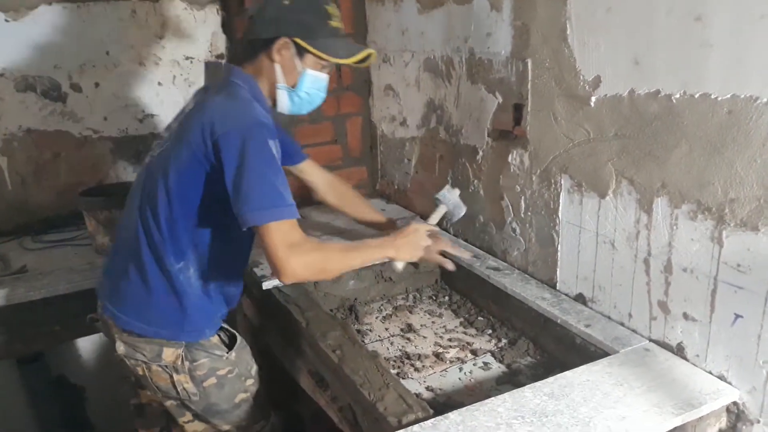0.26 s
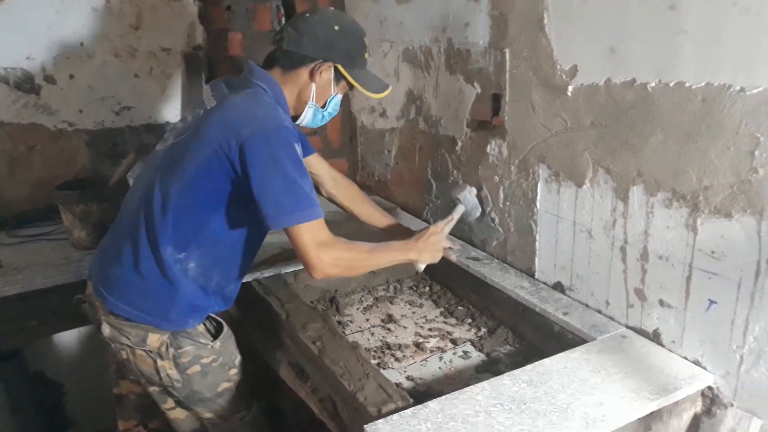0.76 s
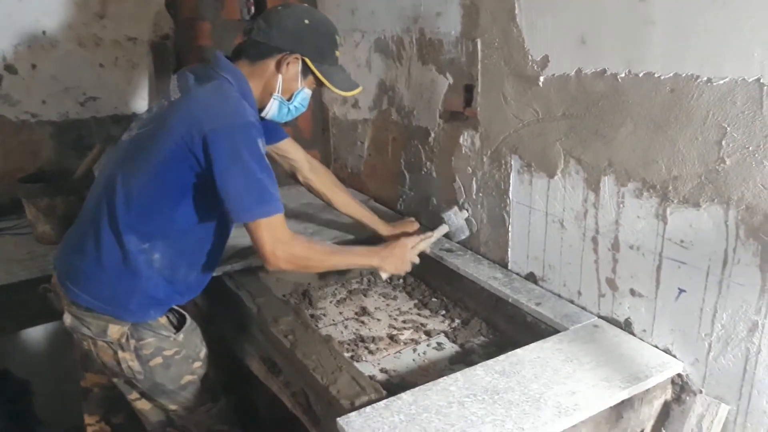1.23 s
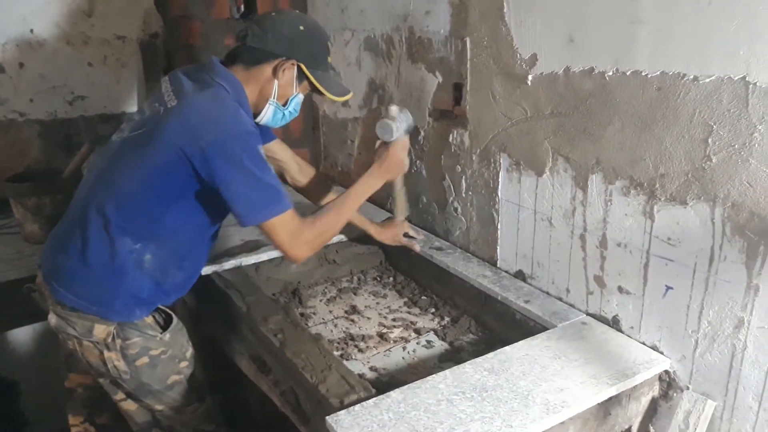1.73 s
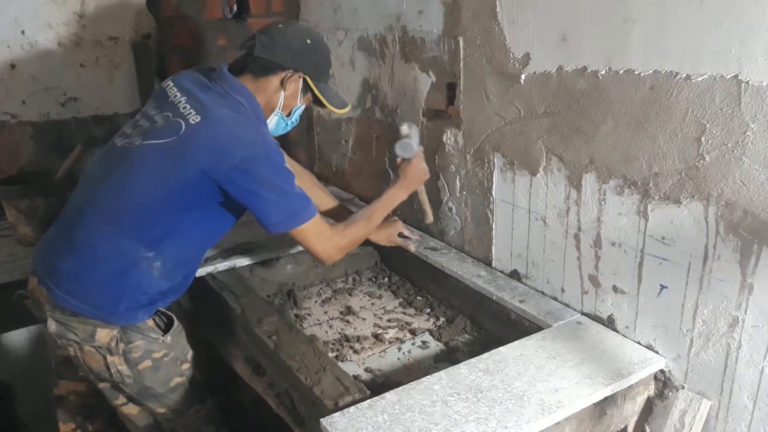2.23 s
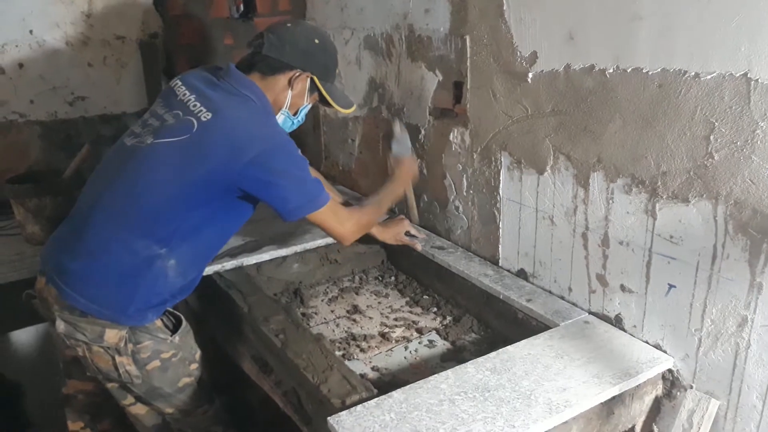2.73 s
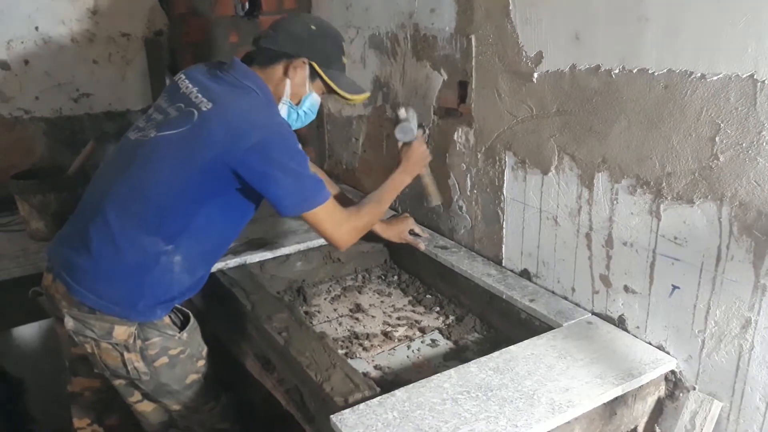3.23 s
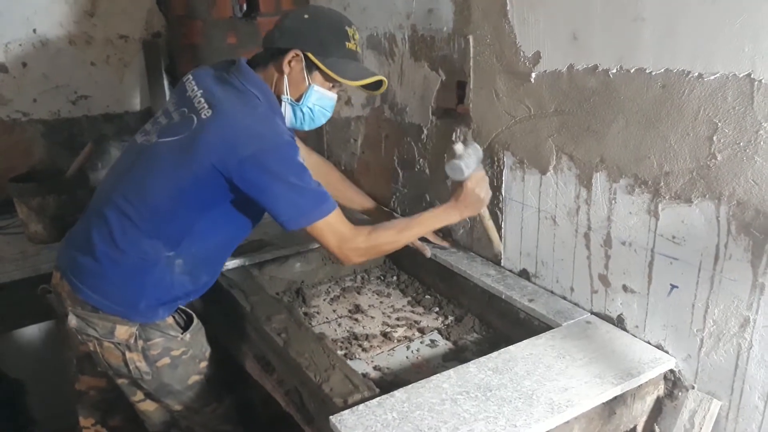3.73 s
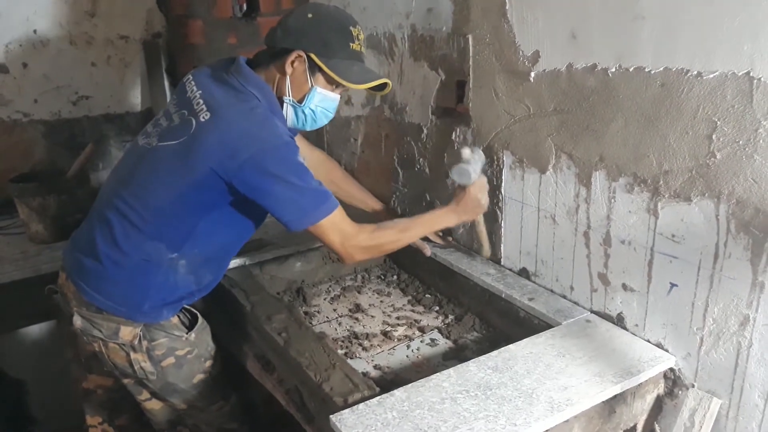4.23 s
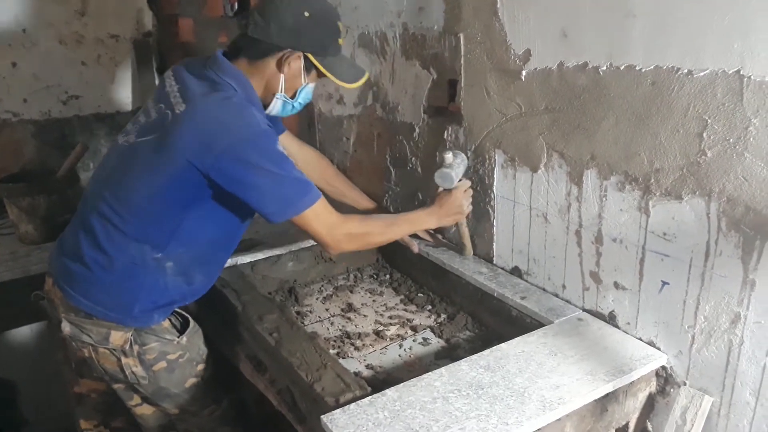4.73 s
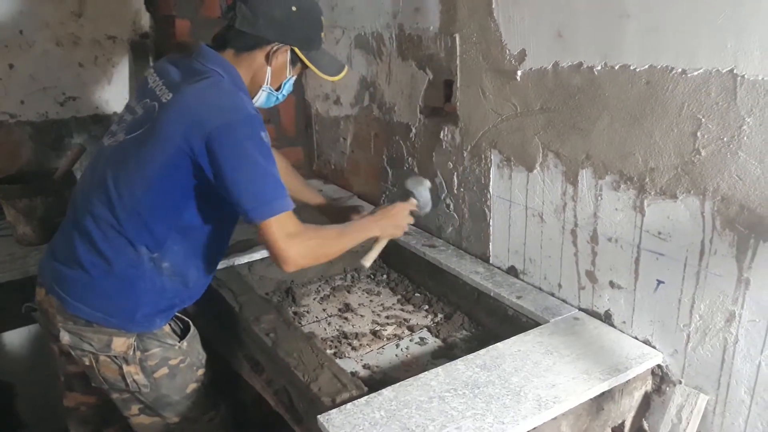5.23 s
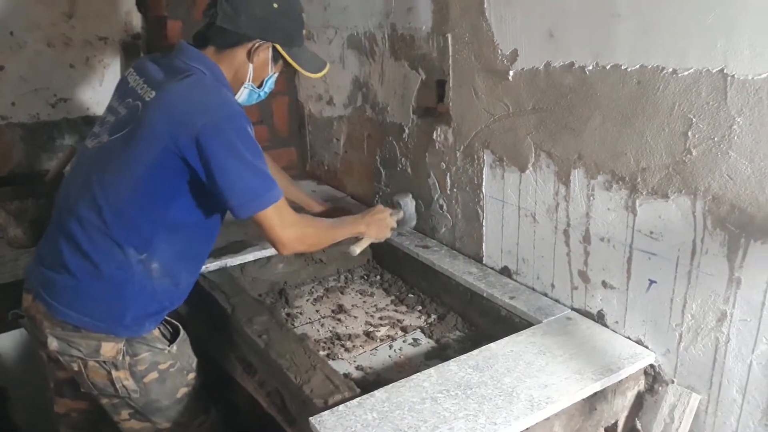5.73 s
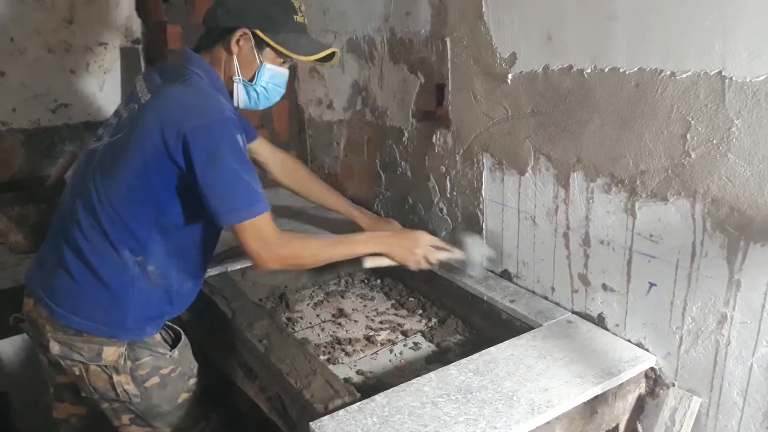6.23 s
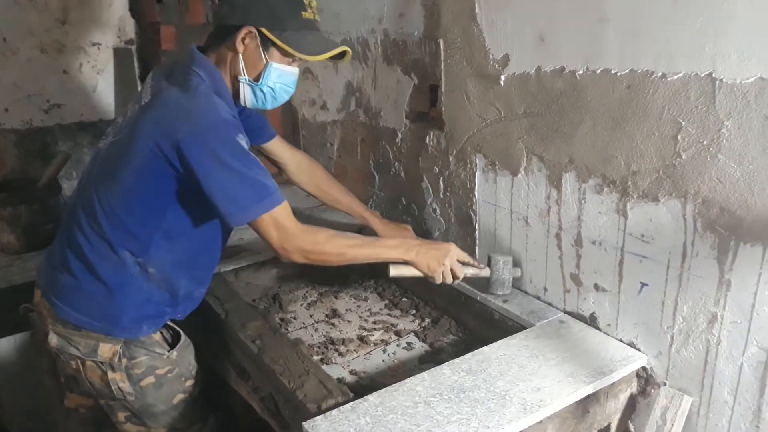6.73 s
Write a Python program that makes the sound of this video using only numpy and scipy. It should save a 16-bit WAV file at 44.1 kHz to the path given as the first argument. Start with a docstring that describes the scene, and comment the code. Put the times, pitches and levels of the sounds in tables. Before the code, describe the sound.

In a small, bare, echoing room, a stone slab is knocked into mortar with a rubber mallet close to the microphone. One bright clack comes first, then a run of nine sharp blows that quickens near its end, and finally five softer thudding taps in two groups. A faint hiss of distant building work continues underneath, dipping after the loud hits, with slight grit ticks and low rumbles.

```python
"""Bedding a stone countertop

A rubber mallet beds a stone slab in mortar in a small bare room: one hard double clack, nine sharp
blows at a few spots along the edge, then five light taps. The mortar damps the stone, so most of the
ring is the room's. Grit and the handle tick faintly, with a few deep rumbles and far squeaks behind.
A distant hiss of site work ducks under the gain control after loud blows."""
import sys
import numpy as np
from scipy import signal
from scipy.fft import rfft, irfft, next_fast_len
from scipy.io import wavfile
from scipy.ndimage import uniform_filter1d, minimum_filter1d

SR = 44100
rng = np.random.default_rng(int(sys.argv[2]) if len(sys.argv) > 2 else 0)


def master_out(mix):
    """Clip the mix to full scale and print it as 16-bit PCM to the path in sys.argv[1]."""
    frames = np.transpose(np.atleast_2d(mix))
    ceiling = np.clip(frames, -1, 1)
    pcm = np.round(ceiling * 32767).astype(np.int16)
    wavfile.write(sys.argv[1], SR, pcm)


N = 308259
SIZE = 65536  # samples in one impulse response
HZ = np.fft.rfftfreq(SIZE, 1 / SR)
T = np.arange(SIZE) / SR

# a graze, then the nine full blows: t/s, strength/dB, clink/dB
BLOWS = [(2.012, -19, -6), (2.0321, 3.5, 19.5), (2.3343, 2, 21.5), (2.774, -0.43, 23.5), (3.04, -2, 19),
         (3.583, 2.5, 29), (3.8914, 0, 29), (4.1595, -0.2, 26), (4.402, 0, 28.5), (4.5638, -2.5, 21.5)]
# spots worked in turn, each coloured by the bedding under it:
# from t/s, clack/dB, crack/dB, clink f/Hz, favoured ring f/Hz
SPOTS = [(0, 6.2, 2.2, 4950, 290), (1.8, -4.5, -6, 4000, 924), (2.55, -3, -3, 3990, 403),
         (3.3, -5.5, -4, 4155, 3000), (5, -1.2, 3.5, 5150, 300), (6.1, -10.5, -13, 4230, 286)]


def amp(db):
    """Decibels to gain."""
    return 10 ** (np.asarray(db) / 20)


def along(points, hz):
    """Read a curve of (f/Hz, value) points on a log frequency axis."""
    f, v = np.transpose(points)
    return np.interp(np.log(hz + 1), np.log(f + 1), v)


def filtered(x, response):
    """Shape x with a frequency response."""
    size = next_fast_len(N + SR)
    return irfft(rfft(x, size) * response(np.fft.rfftfreq(size, 1 / SR)), size)[:N]


def noise(response):
    """Coloured noise of rms 1."""
    x = filtered(rng.standard_normal(N), response)
    return x / np.sqrt(np.mean(x ** 2) + 1e-20)


def causal(db):
    """Minimum-phase response with these gains: it starts at once and rings afterwards."""
    cepstrum = irfft(db * np.log(10) / 20)
    cepstrum[1:SIZE // 2] *= 2
    cepstrum[SIZE // 2 + 1:] = 0
    return np.exp(rfft(cepstrum))


def resonances(modes, f):
    """Band-pass modes (f/Hz, width/Hz, level/dB), summed with alternating polarity."""
    return sum((-1) ** k * amp(db) * 1j * f * width / (hz * hz - f * f + 1j * f * width)
               for k, (hz, width, db) in enumerate(modes))


def add(track, s, response):
    """Sound the first second of a response at time s."""
    part = track[round(s * SR):][:SR]
    part += irfft(response)[:len(part)]


def site_work(hiss_db=-44, floor_db=-53, hum_db=-59):
    """Distant work: a nearly steady hiss over a steady noise floor and a faint hum."""
    # slow drift of the hiss: t/s, level/dB
    drift = [(.3, 1.3), (1.3, 0.8), (6.9, 2.24)]
    # colour of the hiss: f/Hz, level/dB
    hiss_tone = [(25, -55.5), (100, -7.5), (300, -5.5), (600, -8.5), (1100, -3.5), (1900, 2.5),
                 (2700, -2.5), (4000, -15), (7000, -19.5), (15000, -24.5)]
    # colour of the noise floor: f/Hz, level/dB
    floor_tone = [(20, -32), (32, -23), (50, -1), (110, 2), (230, -9), (400, -7.5), (1000, 2.5), (4000, -8),
                  (7000, -19), (15000, -15.5)]
    # bands of the hum: f/Hz, width/Hz, level/dB
    hum_bands = [(108, 9.8, -11.5), (222.7, 4.3, 1.5), (313.4, 7.8, -14.5)]
    drift_db = np.interp(np.arange(N) / SR, *np.transpose(drift))
    hiss = amp(hiss_db + drift_db) * noise(lambda f: amp(along(hiss_tone, f)))
    floor = amp(floor_db) * noise(lambda f: amp(along(floor_tone, f)))
    hum = amp(hum_db) * noise(lambda f: resonances(hum_bands, f) * f / (f + 100))
    return hiss + floor + hum


def reverberation(build_s=0.00083, corner_db=-3, corner_s=0.06):
    """One path through the room: a diffuse tail of equal energy per Hz, dying faster in the treble."""
    # decay of the bare room: f/Hz, t60/s
    decay = [(80, 0.85), (210, 1), (560, 0.62), (1500, 0.68), (3000, 0.63), (6000, 0.44), (14000, 0.37)]
    hz, t, bands = signal.stft(rng.standard_normal(SIZE), SR, nperseg=256)
    fade = np.exp(-np.log(1000) * t / along(decay, hz)[:, None])
    tail = signal.istft(bands * fade, SR, nperseg=256)[1]
    # the corner around the counter throws back a dense early burst
    early = (1 - np.exp(-T / build_s)) * (1 + amp(corner_db) * np.exp(-T / corner_s))
    response = rfft(tail[:SIZE] * early)
    energy = np.abs(uniform_filter1d(np.abs(response) ** 2, size=110))
    return response * causal(-10 * np.log10(energy))


def ticks(grit_rise_s=0.008, grip_rise_s=0.0015, grip_db=1, leads_s=(0.043, 0.024)):
    """Tiny scrapes and their echo: grit, and the handle ticking in the grip twice per quick downswing."""
    # grit scraping under the hand: t/s, level/dB
    scrapes = [(.251, -5), (.441, -8.5), (1.653, -2)]
    # colour of a tick: f/Hz, level/dB
    tone = [(100, -37.5), (2000, -10), (4200, -6.5), (8000, -14), (15000, -19.5)]
    track, pulse = np.zeros(N), causal(along(tone, HZ))
    quick_run = [s for s, _, _ in BLOWS if 3.7 < s < 4.5]
    grip = [(s - lead_s, grip_db, grip_rise_s) for s in quick_run for lead_s in leads_s]
    grit = [(s, db, grit_rise_s) for s, db in scrapes]
    for s, db, rise_s in grip + grit:
        scrape = rng.standard_normal(SIZE) * T * np.exp(-T / rise_s)
        tick = amp(db) * pulse * rfft(scrape / np.linalg.norm(scrape))
        add(track, s, tick * (1 + reverberation()))
    return track


def squeaks(width_hz=120):
    """Faint high squeaks far off: narrow whistles of noise that swell and fade."""
    # each squeak at its peak: t/s, level/dB, f/Hz, half length/s
    whistles = [(.93, -64, 5550, .04), (1.08, -67, 5200, .06), (6.534, -59, 6170, 0.031)]
    track, t = np.zeros(N), np.arange(N) / SR
    for s, db, hz, half_s in whistles:
        swell = np.exp(-((t - s) / half_s) ** 2)
        track += amp(db) * swell * noise(lambda f: resonances([(hz, width_hz, 0)], f) ** 2)
    return track


def slab_ring(travel_s=0.000699):
    """The damped stone's short ring, heard straight and off the nearest walls."""
    # modes of the slab: f/Hz, width/Hz, level/dB
    modes = [(186, 77, 3), (293, 320, -5.5), (892, 125, 4), (1630, 530, -3), (2310, 560, -4),
             (3330, 1200, -4), (4910, 270, 2), (5000, 810, -21.5), (6940, 500, 6.5), (13500, 1700, -1)]
    # early reflections: delay/s, level/dB, cutoff/Hz
    walls = [(.0065, -10.5, 6000), (0.0127, -3.5, 4000), (0.0199, -10, 14000), (.05, -15.5, 6150)]
    echoes = sum(amp(db) * np.exp(-2j * np.pi * HZ * delay) / (1 + 1j * HZ / cutoff) ** 2
                 for delay, db, cutoff in walls)
    # bending waves cross the stone faster in the treble; travel_s is their delay at 1 kHz
    dispersion = np.exp(-4j * np.pi * travel_s * np.sqrt(1000 * HZ))
    return dispersion * resonances(modes, HZ) * (1 + echoes)


def standing_waves():
    """Narrow resonances that ring on in the room, each at a random phase."""
    # modes of the room and counter: f/Hz, level/dB, t60/s
    modes = [(110.5, 10, 1.8), (123.4, 7, 0.88), (163.1, 8.5, 0.51), (203, 1, 0.19), (233.8, 7.5, .5),
             (383.7, 10, 0.46), (427, 9, 0.34), (565.4, 8, 0.21), (887, 4, 1), (1264, 6.5, 0.36),
             (1513, 9.5, 0.21), (1686, 6.5, 0.4), (1730, 10, 0.28), (1906, 9.5, 0.67), (2225, 10.5, 0.33),
             (2383, 11, 0.27), (2440, -1, 0.24), (2726, 4.5, 0.16), (2965, 3, 0.2), (3125, 10.5, 0.29)]
    return sum(amp(db) * np.exp(2j * np.pi * rng.random())
               / (1 + 2j * np.pi * (HZ - hz) * t60 / np.log(1000)) for hz, db, t60 in modes)


def varied(room, change=0.38):
    """The room's answer changes a little from blow to blow."""
    return np.sqrt(1 - change ** 2) * room + change * reverberation()


def strikes(hits, tone, rooms, direct_db, room_db, clink_width_hz, clink_room_db):
    """Each contact is one pulse into slab and room, coloured by its spot, plus a brief stone clink."""
    # partials of the clink under the head: pitch ratio, width ratio, level/dB
    partials = [(1, 1.32, -2), (1.3, 1.5, -11), (1.62, 0.73, -14.5)]
    hardening = 0.46  # a stronger blow is shorter: extra dB of clack and crack per dB of strength
    favour_db, favour_octaves = 4.5, 0.1  # lift and width of the ring that a spot favours
    track, direct = np.zeros(N), amp(direct_db) * slab_ring()
    for s, strength_db, clink_db in hits:
        here = sum(s >= spot[0] for spot in SPOTS[1:])
        _, clack_db, crack_db, clink_hz, ring_hz = SPOTS[here]
        hard_db = hardening * strength_db
        force = [(330, 0),  # thud
                 (600, hard_db + clack_db), (3200, hard_db + clack_db),
                 (4500, hard_db + crack_db)]
        ring_db = favour_db * np.exp(-(np.log2((HZ + 1) / ring_hz) / favour_octaves) ** 2)
        pulse = causal(strength_db + along(tone, HZ) + along(force, HZ) + ring_db)
        body = pulse * (direct + amp(room_db) * varied(rooms[here]))
        clink = sum(amp(clink_db + db) * resonances([(pitch * clink_hz, wide * clink_width_hz, 0)], HZ) ** 2
                    for pitch, wide, db in partials)
        add(track, s, body + clink * (1 + amp(clink_room_db) * rooms[here]))
    return track


def double_clack(rooms):
    """Two hard, bright contacts on the slab, so close that they fuse into one clack."""
    # the two contacts: t/s, strength/dB, clink/dB
    hits = [(1.227, -12.5, 18.5), (1.2303, -1.5, 29)]
    # colour of the clack: f/Hz, level/dB
    tone = [(30, -15), (80, 28), (200, 34), (350, 24.5), (550, 16), (900, 17), (1600, 10), (2600, 23.5),
            (3600, 20.5), (5000, 21.5), (7000, 16.5), (15000, 7.5)]
    return strikes(hits, tone, rooms, direct_db=-5.5, room_db=-3.5, clink_width_hz=330, clink_room_db=-14)


def rumbles(rise_s=0.016, width_ratio=0.51):
    """Deep, soft bands of noise that swell and die away."""
    # each rumble: t/s, level/dB, f/Hz, t60/s
    swells = [(1.28, -54, 46, 2.9), (1.32, -42, 139, .6), (3.79, -37.5, 100, 1.3), (3.83, -36.5, 64, .6)]
    track = np.zeros(N)
    for s, db, hz, t60 in swells:
        age = np.maximum(np.arange(N) / SR - s, 0)
        swell = (1 - np.exp(-age / rise_s)) * np.exp(-np.log(1000) * age / t60)
        track += amp(db) * swell * noise(lambda f: resonances([(hz, width_ratio * hz, 0)], f) ** 2)
    return track


def full_blows(rooms):
    """Sharp mallet blows along the edge that set the whole room ringing."""
    # colour of a blow: f/Hz, level/dB
    tone = [(30, -7.5), (80, 4), (150, 19.5), (240, 24.5), (340, 23.5), (420, 27), (700, 25), (950, 27),
            (1250, 24), (2200, 33), (3250, 25), (4200, 14.5), (6800, 1), (15000, -16)]
    return strikes(BLOWS, tone, rooms, direct_db=3.5, room_db=5.5, clink_width_hz=400, clink_room_db=-18)


def light_taps(rooms):
    """Gentle mallet taps: mostly thud, with little treble."""
    # the closing taps: t/s, strength/dB, clink/dB
    hits = [(5.6345, 0.3, 8), (5.7962, 4.5, 9), (6.3995, -4.5, -10), (6.5755, 0.5, -7), (6.72, 1, -9)]
    # colour of a tap: f/Hz, level/dB
    tone = [(30, -12), (70, 7), (130, 22), (240, 23), (400, 20.5), (650, 15), (1000, 10.5), (1800, 5),
            (3300, -5.5), (6000, -13), (9000, -13.5), (15000, -19)]
    return strikes(hits, tone, rooms, direct_db=-1, room_db=-2.5, clink_width_hz=650, clink_room_db=-17)


def gain_control(x, threshold_db=-17, max_cut_db=5.5, hold_s=0.99, recovery_db_per_s=6):
    """The gain drops by as much as the level passes the threshold, holds, then creeps back."""
    level_db = 10 * np.log10(np.abs(uniform_filter1d(x ** 2, size=882)) + 1e-12)
    wanted_db = np.clip(threshold_db - level_db, -max_cut_db, 0)
    half = int(hold_s * SR / 2)
    held_db = minimum_filter1d(wanted_db, size=2 * half + 1, origin=half, mode="constant")
    climb_db = recovery_db_per_s * np.arange(N) / SR
    gain_db = np.minimum.accumulate(held_db - climb_db) + climb_db
    return x * amp(uniform_filter1d(gain_db, size=220))


def limiter(x, window=89):
    """A 2 ms gain dip holds each peak to full scale."""
    needed = 1 / np.maximum(np.abs(x), 1)
    return x * uniform_filter1d(minimum_filter1d(needed, size=window), size=window)


def scene():
    """Mallet work over the background, in mono; every spot excites the room in its own way."""
    rooms = [reverberation() + standing_waves() for _ in SPOTS]
    mallet = full_blows(rooms) + light_taps(rooms) + double_clack(rooms)
    return (mallet + ticks() + rumbles() + site_work() + squeaks())[None]


def record(dry, top_hz=15900):
    """Microphone colour, ducking gain control, a fast limiter and a steep high cut."""
    # the microphone's dip in the high treble: f/Hz, level/dB
    microphone = [(7000, -0.5), (8200, -6), (9500, -19), (11200, -16.5), (13000, -5), (14500, -6)]
    coloured = filtered(dry[0], lambda f: amp(along(microphone, f)))
    levelled = limiter(gain_control(coloured))
    return filtered(levelled, lambda f: 1 / (1 + (f / top_hz) ** 200))[None]


dry = scene()
out = record(dry)
master_out(out)
```